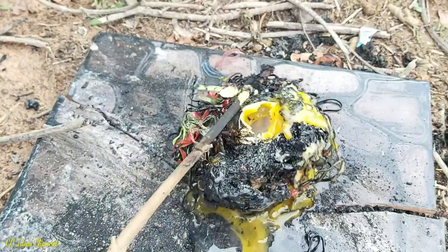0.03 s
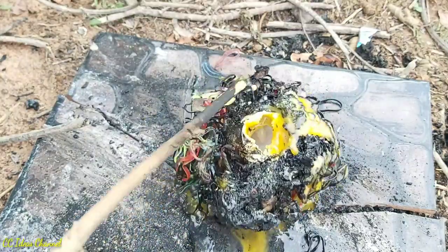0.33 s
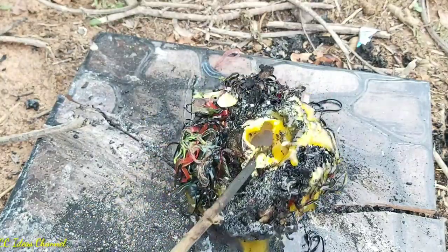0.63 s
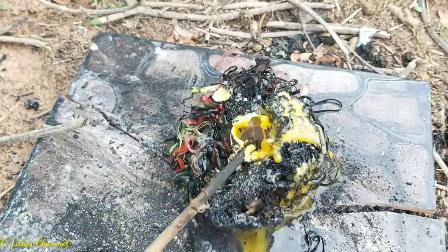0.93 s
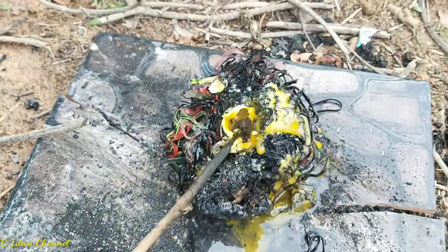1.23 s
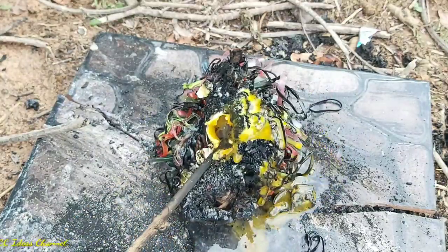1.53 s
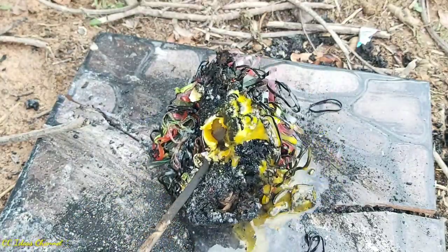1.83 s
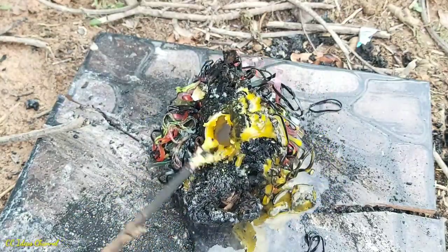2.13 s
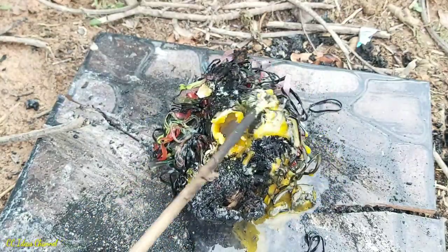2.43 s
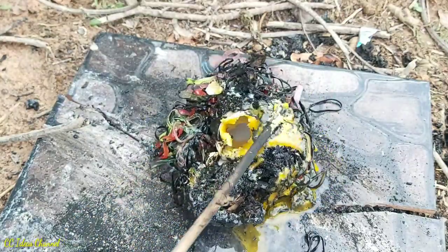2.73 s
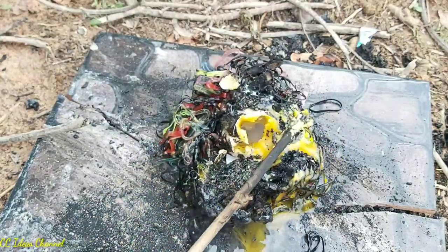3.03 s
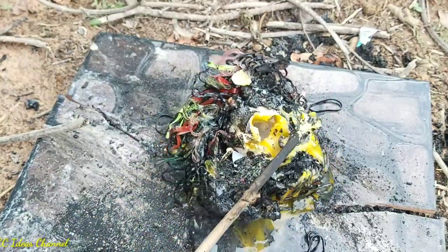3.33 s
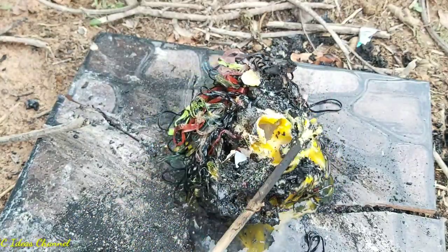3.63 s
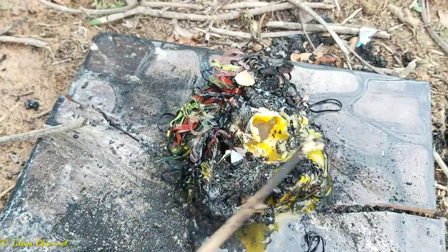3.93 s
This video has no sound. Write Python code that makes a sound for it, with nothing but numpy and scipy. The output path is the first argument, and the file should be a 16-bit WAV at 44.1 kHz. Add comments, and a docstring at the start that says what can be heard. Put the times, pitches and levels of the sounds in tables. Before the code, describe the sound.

A stick pokes a charred, crusty lump with sharp little cracks and soft scrapes outdoors.

```python
"""Outdoors, a distant rumble, a thin hiss and two pulsing insects run under far yelps and small birds.
At 0.6 s a stick, very close, pokes a charred, crusty lump on a sheet: the crust snaps and crumbles,
a small hollow rings near 1 kHz and the soft inside puffs. From 1.2 s come gentler pokes and gritty
scrapes. The birds stop, and at 2.4 s a faint animal cry sounds far off.
At 3.2 s a flurry of sharp pokes breaks out, and a last soft scrape follows."""
import sys
import numpy as np
from scipy import signal
from scipy.fft import rfft, irfft
from scipy.io import wavfile

SR = 44100
rng = np.random.default_rng(int(sys.argv[2]) if len(sys.argv) > 2 else 0)


def bounce(signal):
    """Save signal as a 16-bit WAV file at the path given by the first command-line argument."""
    frames = np.transpose(np.atleast_2d(signal))
    limited = np.clip(frames, -1, 1)
    pcm = np.round(limited * 32767).astype(np.int16)
    wavfile.write(sys.argv[1], SR, pcm)


N = 176400  # 4 seconds


def amp(db):
    """Turns decibels into a number to multiply by."""
    return 10 ** (np.asarray(db) / 20)


def unit_level(x):
    """Scales a sound so that its average level (rms) is 1."""
    return x / np.sqrt(np.mean(x ** 2) + 1e-20)


def burst(x, hold_s=.01):
    """Gives a short sound the energy of level 1 held for hold_s."""
    return unit_level(x) * np.sqrt(hold_s * SR / x.shape[-1])


def look_up(table, hz):
    """Reads between the rows of a table, on a scale of octaves."""
    row_hz, value = np.transpose(table)
    return np.interp(np.log(hz + 1), np.log(row_hz), value)


def add(mix, time_s, sound):
    """Mixes in a stereo sound at time_s, which may be before zero."""
    start = round(time_s * SR)
    sound = sound[..., max(-start, 0):]
    part = mix[:, max(start, 0):][:, :sound.shape[-1]]
    part += sound[..., :part.shape[1]]


def pan(db):
    """Makes the left side db louder than the right."""
    return amp([[db / 2], [-db / 2]])


def colour(x, tone, size=1024):
    """Turns frequencies up or down by a tone table, with no ringing ahead of a click."""
    log_gain = np.log(amp(look_up(tone, abs(np.fft.fftfreq(size, 1 / SR)))))
    taps = np.fft.ifft(np.exp(np.conj(signal.hilbert(log_gain)))).real
    return signal.fftconvolve(x, taps[None], axes=1)[:, :x.shape[1]]


def resonate(x, hz, q):
    """Brings out one pitch; a higher q rings longer."""
    return signal.lfilter(*signal.iirpeak(min(hz, SR / 3), max(q, .5), SR), x)


def drift(count, rate_hz):
    """A smooth random wobble, about 1 in size."""
    smoothing = np.exp(-(np.fft.rfftfreq(N, 1 / SR) / rate_hz) ** 2)
    return unit_level(irfft(rfft(rng.standard_normal(N)) * smoothing, N))[:count]


# how long the outdoor echo takes to fade by 60 dB (frequency [Hz], time [s])
ECHO_FADE = [(200, 1), (1000, 0.55), (4000, 0.21), (13000, 0.12)]
def echo(x):
    """The ground and trees scatter sound back as a soft tail."""
    hz, t, noise = signal.stft(rng.standard_normal((2, SR)), SR, nperseg=256)
    fade = np.exp(-np.log(1000) * t / look_up(ECHO_FADE, hz)[:, None])
    tail = signal.istft(noise * fade, SR, nperseg=256)[1]
    return signal.fftconvolve(x, tail / np.linalg.norm(tail[0]), axes=1)[:, :N]


# how alike the left and right sides are (frequency [Hz], likeness [0 to 1])
LIKENESS = [(120, 0.96), (300, 0.73), (700, 0.093), (3000, 0.031)]
def steady_noise(tone):
    """Even noise whose bass is nearly the same in both ears."""
    hz = np.fft.rfftfreq(N, 1 / SR)
    left, other = rfft(rng.standard_normal((2, N)))
    same = look_up(LIKENESS, hz)
    right = same * left + np.sqrt(1 - same ** 2) * other
    return unit_level(irfft(np.array([left, right]) * amp(look_up(tone, hz)), N))


# tone of the rumble and of the hiss (frequency [Hz], relative level [dB])
RUMBLE_TONE = [(26, -33), (41, 0), (57, -1), (100, -1), (130, -2), (170, -11), (230, -21.5), (320, -23),
               (450, -32.5), (700, -50), (1500, -71.5)]
HISS_TONE = [(200, -10), (700, 3), (1200, 3), (2000, -3), (3000, -3.5), (4100, 4), (5200, -5.5), (7000, -5),
             (11000, -5.5), (15500, -10.5)]
def background():
    """A distant rumble swells gently under a thin, flickering hiss."""
    rumble = steady_noise(RUMBLE_TONE) * amp(-36.5 + 1.2 * drift(N, rate_hz=1.7))
    hiss = steady_noise(HISS_TONE) * amp(-65.5 + .7 * drift(N, rate_hz=12))
    return rumble + hiss


# each insect's runs of evenly spaced chirps (first chirp [s], last chirp [s], count)
CRICKET_RUNS = [(.005, .575, 6), (.688, 1.548, 9), (1.648, 3.021, 14), (3.175, 3.925, 8)]
BUZZ_RUNS = [(.025, 2.495, 22)]
def insect(runs, pitch_hz, width_hz, swell_s, db):
    """A far insect: a narrow band of noise swells once for each chirp."""
    hz, t = np.fft.rfftfreq(N, 1 / SR), np.arange(N) / SR
    times = np.concatenate([np.linspace(*run) for run in runs])
    band = 1 / (1 + ((hz - pitch_hz) / width_hz) ** 4)
    rasp = unit_level(irfft(rfft(rng.standard_normal((2, N))) * band, N))
    swells = np.sqrt(sum(np.exp(-((t - time_s) / swell_s) ** 2) for time_s in times))
    return amp(db) * rasp * swells


def calls(rows, voice, waver, rasp, echo_db, glide_share=1, swell=1):
    """Far, sliding calls: waver shakes the pitch, rasp the level; overtones grow with the slide."""
    out = np.zeros((2, N))
    for start_s, length_s, from_hz, to_hz, db in rows:
        progress = np.linspace(0, 1, round(length_s * SR))
        glide = np.minimum(progress / glide_share, 1)
        hz = (from_hz + (to_hz - from_hz) * glide) * (1 + waver * drift(len(glide), rate_hz=150))
        cycles = np.cumsum(hz) / SR
        tone = sum(amp(level) * glide ** abs(k - 1) * np.sin(2 * np.pi * k * cycles)
                   for k, level in voice)
        tone *= 1 + rasp * drift(len(glide), rate_hz=from_hz / 10)
        arch = abs(np.sin(np.pi * progress)) ** swell
        add(out, start_s, amp(db) * unit_level(tone * arch))
    return out + amp(echo_db) * echo(out)


# bird notes (start [s], length [s], first base pitch [Hz], last base pitch [Hz], level [dB])
WHISTLES = [(.02, 0.092, 4480, 3930, -68), (.73, 0.34, 4650, 2860, -73.5), (.81, 0.26, 4660, 3760, -68),
            (1.1, 0.22, 4820, 3100, -71.5), (1.785, 0.09, 4450, 3810, -70), (2.21, 0.096, 4600, 4090, -68)]
BIRD_RASPS = [(1.7, 0.088, 3190, 3300, -71), (2.18, 0.13, 3550, 3120, -71.5)]
def birds():
    """Small birds give falling whistles and hoarse notes, a little below the base pitch."""
    whistles = calls(WHISTLES, voice=[(.95, 0)], waver=.007, rasp=.5, echo_db=-4.5)
    hoarse_notes = calls(BIRD_RASPS, voice=[(.96, 0)], waver=.05, rasp=.5, echo_db=-4.5)
    return whistles + hoarse_notes


# animal calls (start [s], length [s], first base pitch [Hz], last base pitch [Hz], level [dB])
YELPS = [(-.06, 0.1006, 499, 572.7, -49), (.448, 0.135, 465, 584, -52)]
CRY = [(2.44, 0.256, 772, 728, -70)]
# the two tones in each voice (pitch [times the base pitch], relative level [dB])
YELP_VOICE = [(0.999, -1), (3.201, -10.5)]
CRY_VOICE = [(1.001, -1), (2.422, -8.5)]
def far_animals():
    """Two rising yelps and one faint, rough cry, blurred by distance."""
    yelps = calls(YELPS, YELP_VOICE, waver=.022, rasp=.35, echo_db=-5, glide_share=.85, swell=.66)
    cry = calls(CRY, CRY_VOICE, waver=.0404, rasp=1, echo_db=0, glide_share=.14, swell=.21)
    return yelps + cry


HOLLOW_PAN_DB, LEFT_LEAD_S, POKE_SAMPLES = 5, .00005, 2048

# row one is the first yelp's faint, fading echo near 1 kHz; the others are strokes of the stick
# (start [s], length [s], grit level [dB], ring level [dB])
RUSTLES = [(.01, 0.21, -66, -64.5), (0.6349, 0.017, -36.5, -41), (0.674, 0.011, -31.5, -52),
           (1.2, 0.3, -62, -70), (1.405, 0.034, -56, -51), (1.454, 0.11, -65, -59.5),
           (1.857, 0.43, -65, -68), (2.439, 0.13, -59.5, -69.5), (2.521, 0.16, -63.5, -82),
           (2.631, 0.23, -65, -75), (2.776, 0.25, -64.5, -70.5), (3.254, 0.022, -50.5, -53),
           (3.42, 0.079, -62, -70), (3.477, 0.084, -54.5, -59.5), (3.564, 0.2, -63, -72),
           (3.845, 0.22, -66, -77)]
# tone of the grit (frequency [Hz], relative level [dB])
GRIT_TONE = [(700, -32.5), (1050, 2.5), (2000, 5), (4000, 5.5), (6500, 2), (9000, 0.5), (12500, 0.5),
             (16000, -8)]
def yelp_echo_and_scrapes(grains_per_s=2200, spread_db=4, flicker_db=1.8, rise_db=.5):
    """Grainy rustles: first a yelp's echo, then the tip dragging unevenly and stirring the hollow."""
    sizes = amp(spread_db * np.minimum(rng.exponential(1, N), 4))
    hits = rng.random(N) < grains_per_s / SR
    grains = sizes * hits * rng.standard_normal((2, N))
    grains *= amp(flicker_db * drift(N, rate_hz=35))
    grit = colour(grains, GRIT_TONE)
    poke_times, *_, ring_pitches = np.transpose(POKES)  # each rustle rings at nearby pokes' pitch
    out = np.zeros((2, N))
    for start_s, length_s, grit_db, ring_db in RUSTLES:
        part = slice(round(start_s * SR), round((start_s + length_s) * SR))
        ring_hz = np.interp(start_s + length_s / 2, poke_times, ring_pitches)
        ring = resonate(resonate(grains.sum(0), ring_hz, q=9), ring_hz, q=2.5)
        rustle = amp(grit_db) * unit_level(grit[:, part])
        rustle += amp(ring_db) * pan(HOLLOW_PAN_DB) * unit_level(ring[part])
        soft_ends = signal.windows.tukey(rustle.shape[1], .5)
        add(out, start_s, rustle * soft_ends * amp(np.linspace(0, rise_db, rustle.shape[1])))
    return out


# pokes that reach the soft inside (time [s], level [dB])
PUFFS = [(.6805, -45), (2.467, -55)]
def puffs(low_hz=300, high_hz=650, decay_s=.0018):
    """The soft inside gives way with a small, dull puff."""
    out, t = np.zeros((2, N)), np.arange(POKE_SAMPLES) / SR
    band = signal.butter(2, [low_hz, high_hz], "band", fs=SR)
    for time_s, db in PUFFS:
        noise = rng.standard_normal(len(t)) * np.exp(-t / decay_s)
        add(out, time_s, amp(db) * burst(signal.lfilter(*band, noise)))
    return out


# the dry stick's own notes (pitch [Hz], relative level [dB])
STICK_NOTES = [(1750, -6.5), (2450, -3.5), (4220, 3.5), (7300, 20)]
def stick_ping(t, snap_hz, reach_octaves=.4, decay_s=.0013, low_cut_hz=1400):
    """A snap shakes the thin stick, favouring the notes near the snap's own pitch."""
    age = np.maximum(t - np.array([[0], [LEFT_LEAD_S]]), 0)
    notes = np.zeros_like(age)
    for hz, db in STICK_NOTES:
        strength = amp(db) / (1 + (np.log2(hz / snap_hz) / reach_octaves) ** 4)
        notes += strength * np.sin(2 * np.pi * hz * age)
    low_cut = signal.butter(4, low_cut_hz, "high", fs=SR)
    return burst(signal.lfilter(*low_cut, notes * np.exp(-age / decay_s)))


def hollow_ring(t, hz, decay_s=.0046):
    """The small hollow rings with one quickly dying note."""
    low_cut = signal.butter(5, .8 * hz, "high", fs=SR)
    return burst(signal.lfilter(*low_cut, np.sin(2 * np.pi * hz * t) * np.exp(-t / decay_s)))


def fracture(t, decay_s, splinter_db):
    """The crust breaks: one click, reaching the left side first, then fading splinters."""
    click = np.sinc((t - np.array([[0], [LEFT_LEAD_S]])) * SR - 4)
    splinters = rng.standard_normal(len(t)) + .45 * rng.standard_normal((2, len(t)))
    return burst(click) + amp(splinter_db) * burst(splinters * np.exp(-t / decay_s))


# tone of the snapping crust and of its finest crumbs (frequency [Hz], relative level [dB])
SNAP_TONE = [(400, -56), (800, -43.5), (1150, 12.5), (2300, 0.5), (2900, -4), (4200, 4.5), (5400, -5.5),
             (7000, -9.5), (15000, 2.5)]
CRUMB_TONE = [(2000, -13), (4500, -2.5), (6500, 2.5), (8000, 5.5), (11000, 2.5), (13500, -0.5),
              (16000, -31)]
# jabs of the stick
# (time [s], snap strength [dB], snap pitch [Hz], crumb level [dB], ring level [dB], ring pitch [Hz])
POKES = [(0.643, -46.5, 3570, -37, -49, 983), (0.6457, -41, 2100, -57, -40.5, 987),
         (0.678, -58, 2600, -36.5, -72, 965), (0.6811, -44.5, 1640, -67, -23.5, 935),
         (1.3254, -65.5, 2370, -71, -49, 953), (1.3946, -38, 2500, -43, -37, 982),
         (1.4851, -65, 1930, -80, -58, 1000), (1.507, -68, 1700, -71, -52, 1000),
         (1.585, -86, 2000, -90, -55, 1025), (1.8967, -58, 3400, -58, -50, 1033),
         (1.9943, -63, 1530, -61, -59, 1030), (2.022, -62, 1570, -65, -54, 1000),
         (2.467, -49.5, 3050, -49, -59, 880), (2.8843, -56, 3260, -56.5, -54.5, 1000),
         (3.0178, -59.5, 3250, -60, -60.5, 1000), (3.0645, -71, 3200, -72, -61, 1000),
         (3.092, -69, 4200, -64.5, -72, 1020), (3.2064, -56.5, 3550, -62.5, -61, 1020),
         (3.2318, -30.5, 4130, -42, -42, 1050), (3.2439, -43, 2620, -46, -57, 1090),
         (3.2492, -33.5, 2560, -43.5, -66, 1210), (3.2643, -38, 2480, -56, -42.5, 1034),
         (3.4076, -33.5, 4170, -49, -64, 1010), (3.408, -35, 1730, -67, -31, 1038),
         (3.4399, -63, 4130, -55, -52, 1030), (3.4583, -45.5, 3640, -51, -71, 1070),
         (3.4779, -45.5, 2600, -77, -50, 1020), (3.4971, -45, 3840, -66, -53, 1040),
         (3.529, -49.5, 3770, -71, -52.5, 1083), (3.5985, -45, 3660, -52, -60, 1060),
         (3.632, -58, 3580, -60, -67, 1000), (3.7218, -39.5, 4250, -78, -54.5, 1076)]
def pokes():
    """Each poke snaps the crust, pings the stick, sheds crumbs and rings the hollow."""
    out, t = np.zeros((2, N)), np.arange(POKE_SAMPLES) / SR
    for time_s, snap_db, snap_hz, crumb_db, ring_db, ring_hz in POKES:
        crust = colour(fracture(t, decay_s=.0024, splinter_db=6.5), SNAP_TONE)
        crack = burst(resonate(crust, snap_hz, q=1.96))
        snap = amp(-4) * crack + amp(-2) * stick_ping(t, snap_hz)
        crumbs = burst(colour(fracture(t, decay_s=.0027, splinter_db=-3.5), CRUMB_TONE))
        add(out, time_s, amp(snap_db) * pan(db=-1) * snap)
        add(out, time_s, amp(crumb_db) * pan(db=-4) * crumbs)
        add(out, time_s, amp(ring_db) * pan(HOLLOW_PAN_DB) * hollow_ring(t, ring_hz))
    return out


# tone of the echo of the pokes and rustles (frequency [Hz], relative level [dB])
ECHO_TONE = [(1000, -7.5), (4000, 3.5), (7000, -2), (12000, 8.5)]
def scene():
    """The stick up close with a faint echo, the wildlife and rumble far behind."""
    pokes_and_rustles = pokes() + puffs() + yelp_echo_and_scrapes()
    cricket = insect(CRICKET_RUNS, pitch_hz=5743, width_hz=260, swell_s=.014, db=-63)
    buzzer = insect(BUZZ_RUNS, pitch_hz=8700, width_hz=510, swell_s=.031, db=-65.5) * pan(db=-3)
    wildlife = cricket + buzzer + birds() + far_animals()
    tail = amp(-20.5) * echo(colour(pokes_and_rustles, ECHO_TONE))
    return background() + wildlife + tail + pokes_and_rustles


def record(dry, top_hz=15900):
    """Cuts away the very highest treble."""
    high_cut = signal.firwin(255, top_hz, window=("kaiser", 8), fs=SR)
    return signal.oaconvolve(dry, high_cut[None], "same")


dry = scene()
out = record(dry)
bounce(out)
```